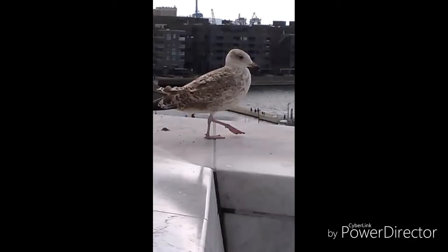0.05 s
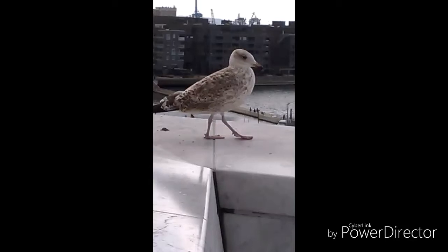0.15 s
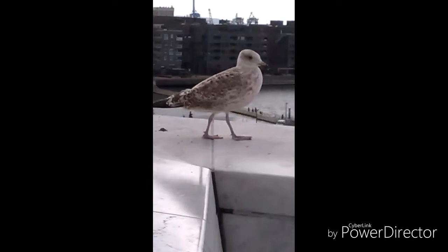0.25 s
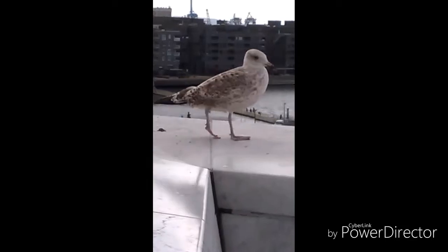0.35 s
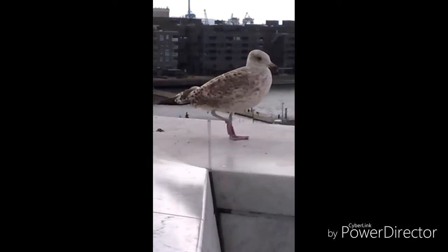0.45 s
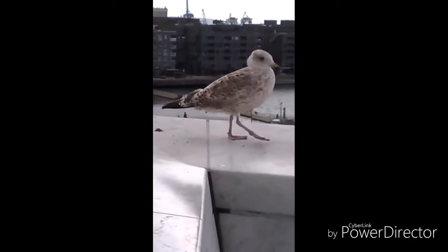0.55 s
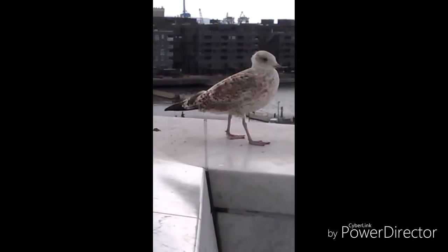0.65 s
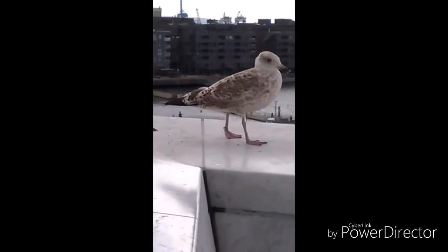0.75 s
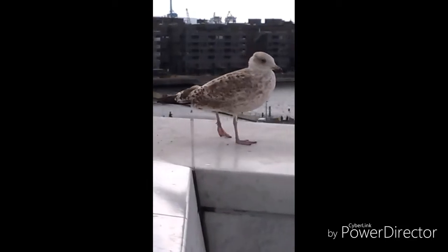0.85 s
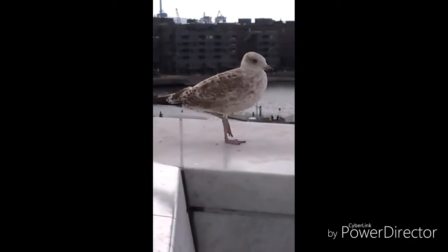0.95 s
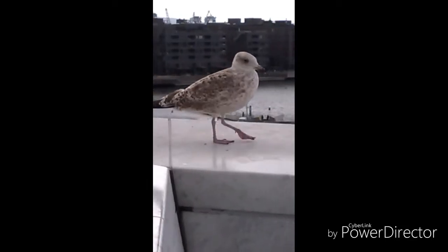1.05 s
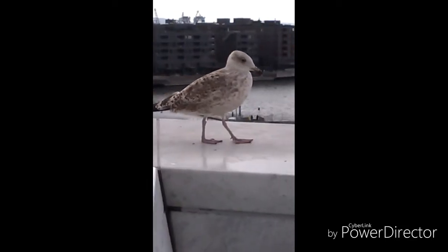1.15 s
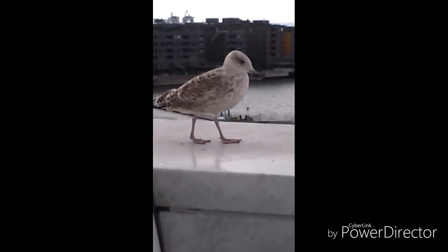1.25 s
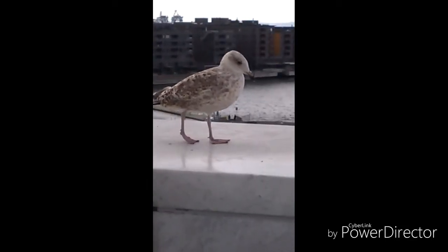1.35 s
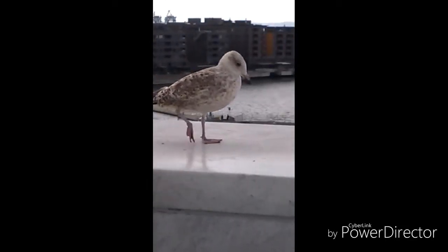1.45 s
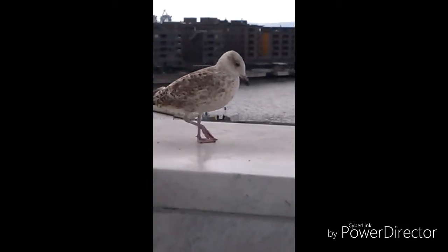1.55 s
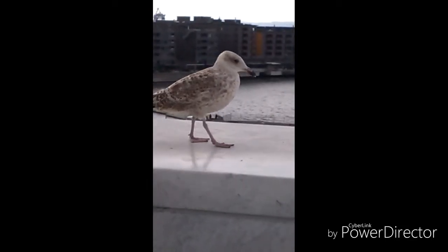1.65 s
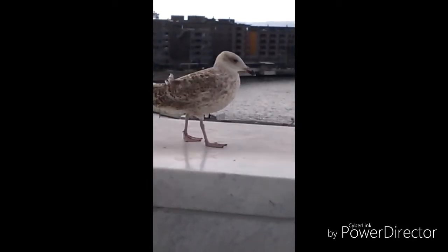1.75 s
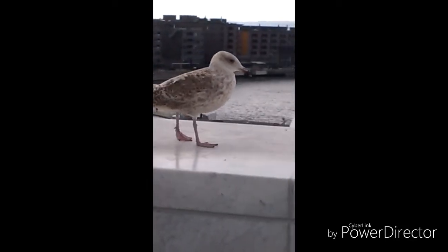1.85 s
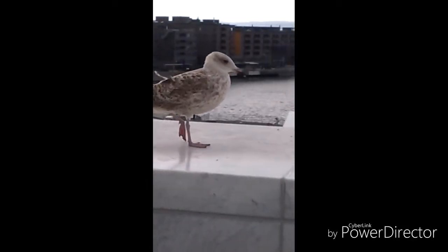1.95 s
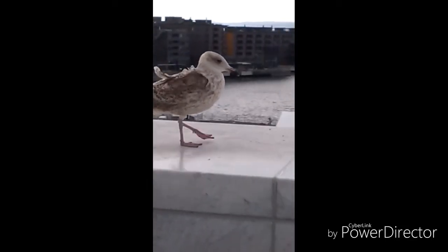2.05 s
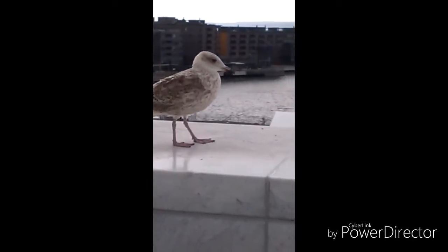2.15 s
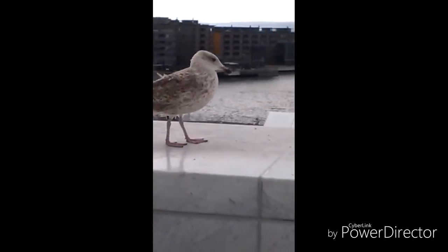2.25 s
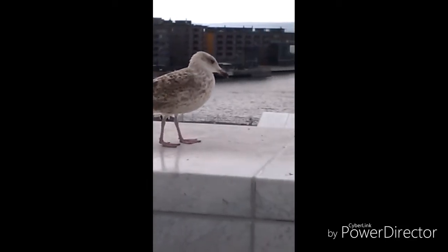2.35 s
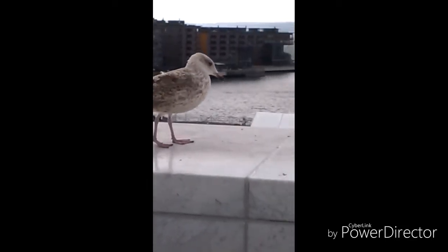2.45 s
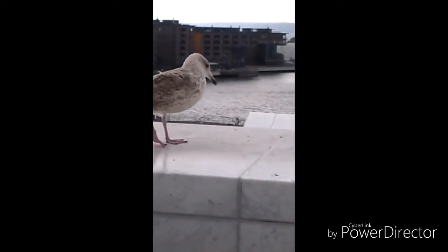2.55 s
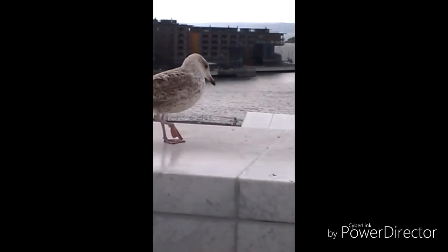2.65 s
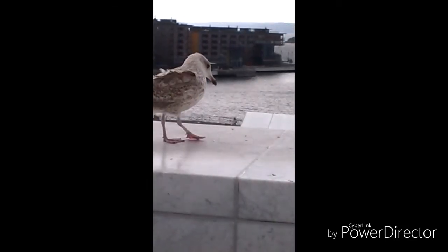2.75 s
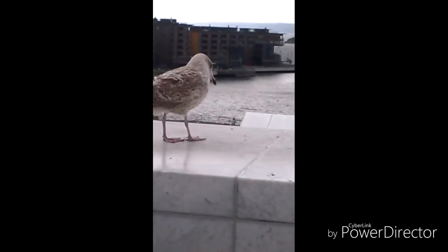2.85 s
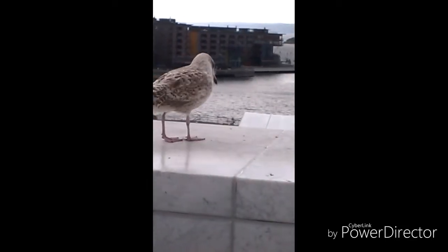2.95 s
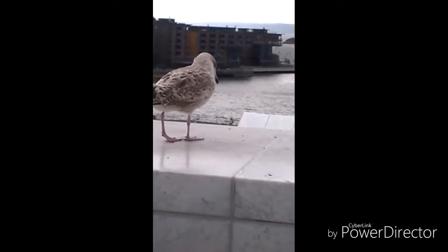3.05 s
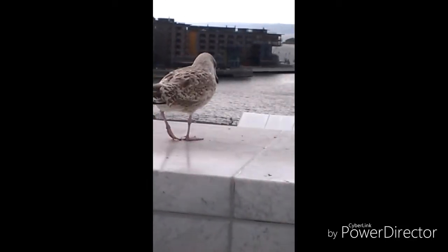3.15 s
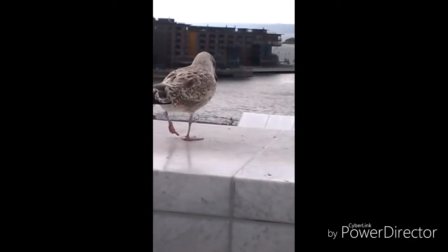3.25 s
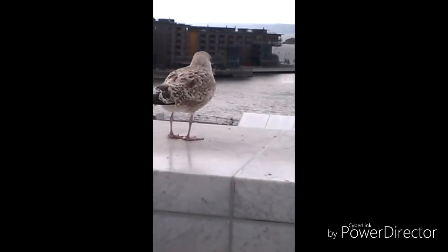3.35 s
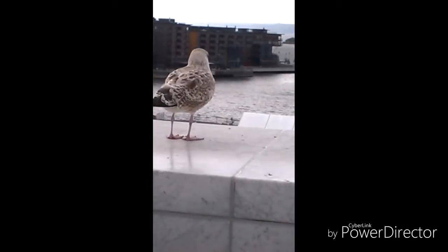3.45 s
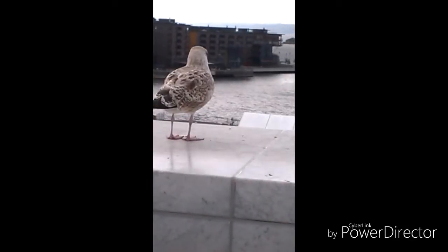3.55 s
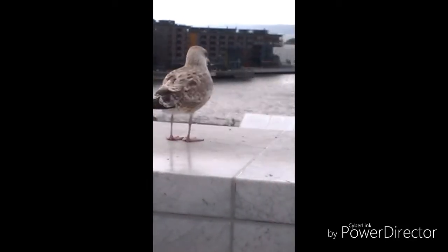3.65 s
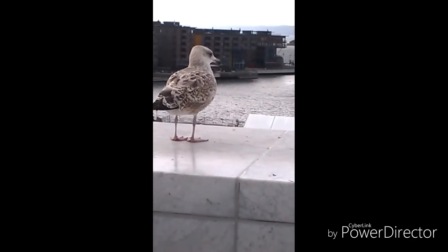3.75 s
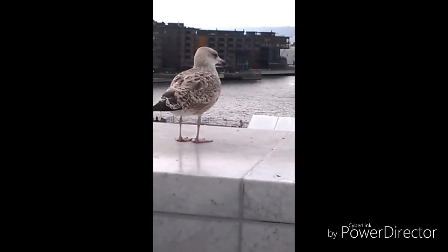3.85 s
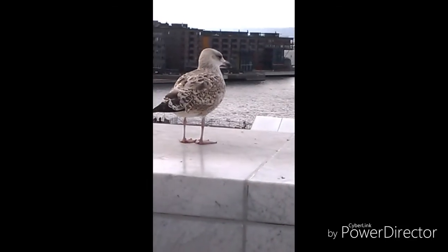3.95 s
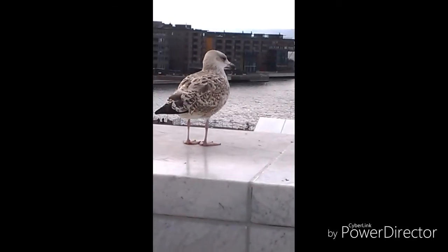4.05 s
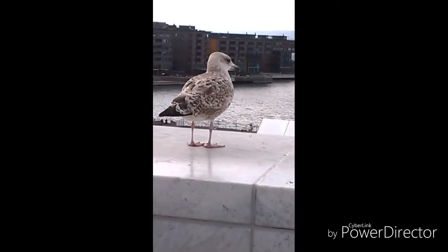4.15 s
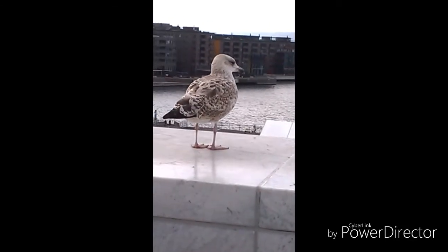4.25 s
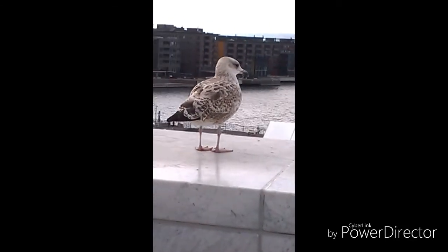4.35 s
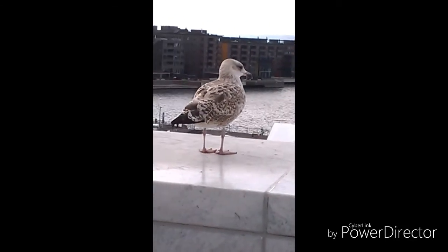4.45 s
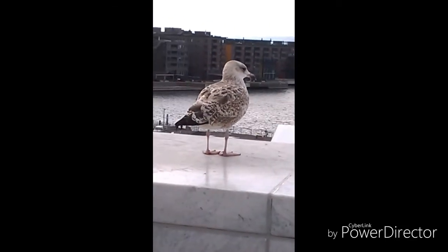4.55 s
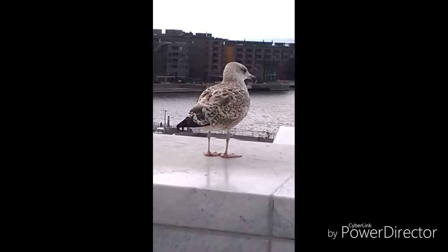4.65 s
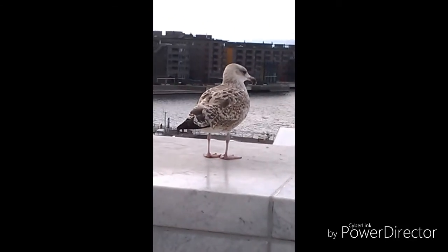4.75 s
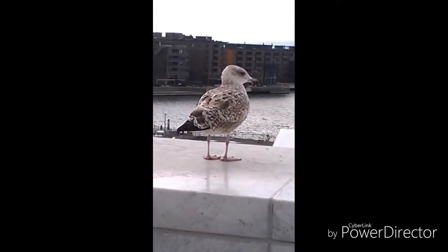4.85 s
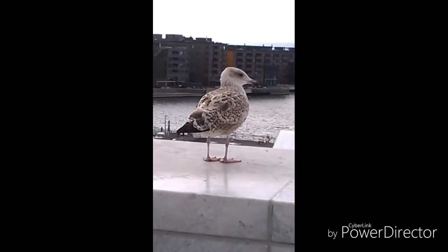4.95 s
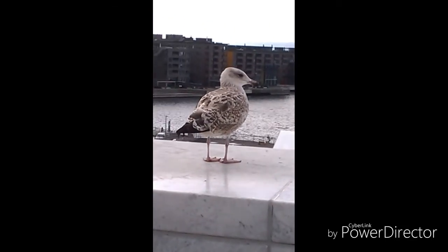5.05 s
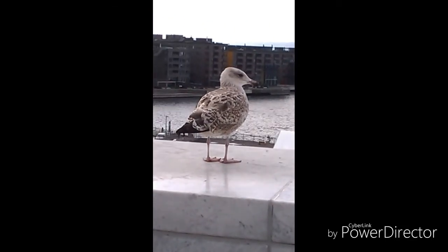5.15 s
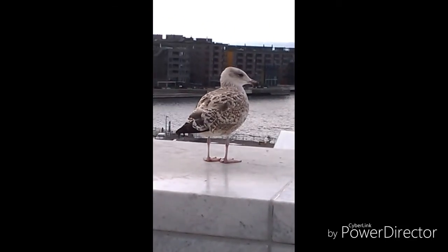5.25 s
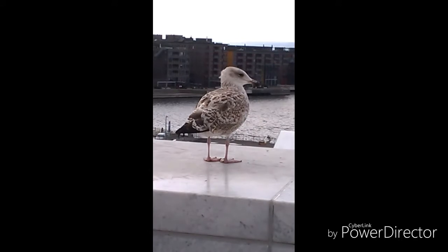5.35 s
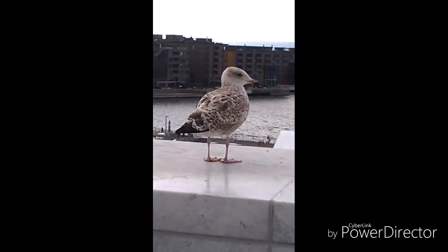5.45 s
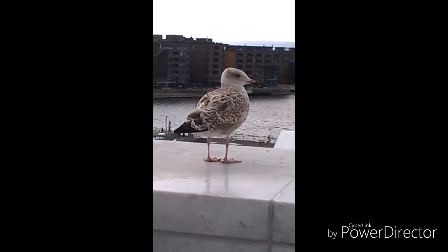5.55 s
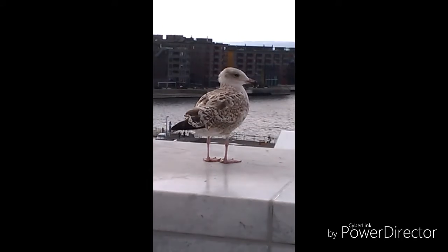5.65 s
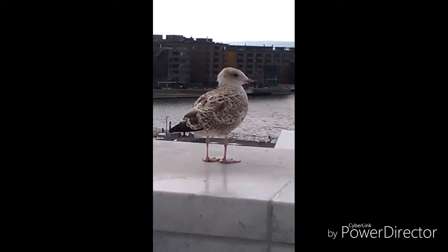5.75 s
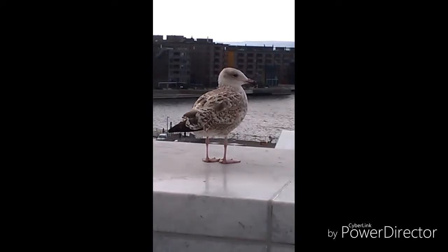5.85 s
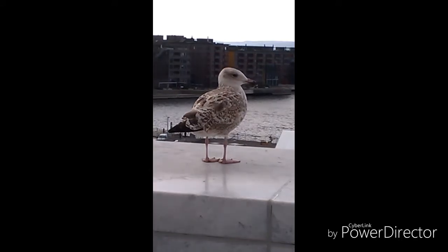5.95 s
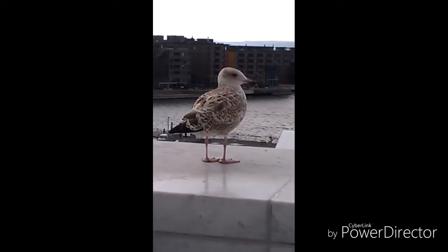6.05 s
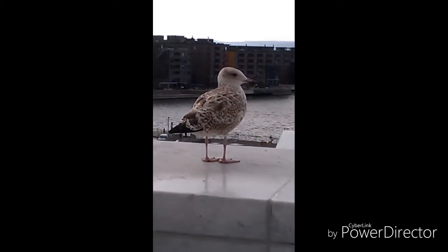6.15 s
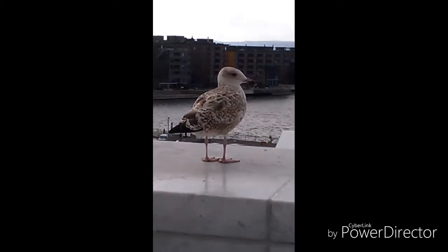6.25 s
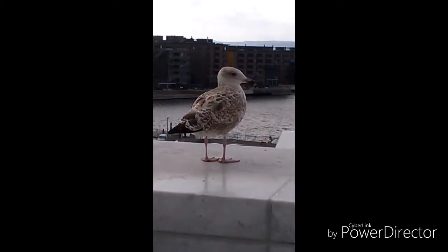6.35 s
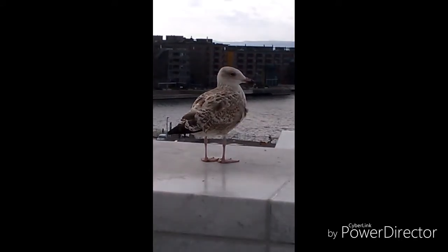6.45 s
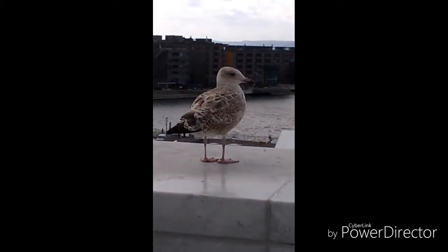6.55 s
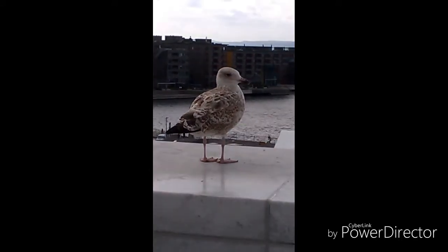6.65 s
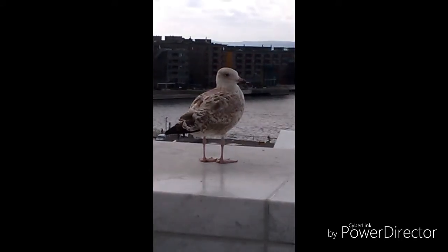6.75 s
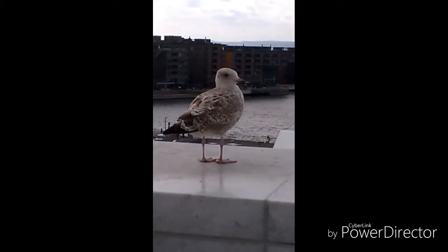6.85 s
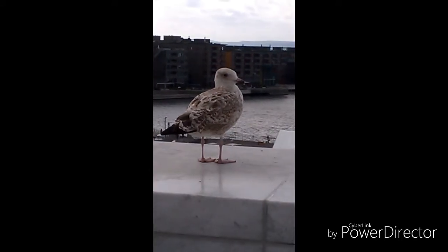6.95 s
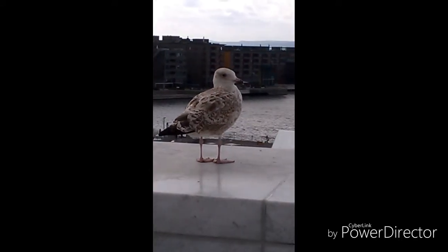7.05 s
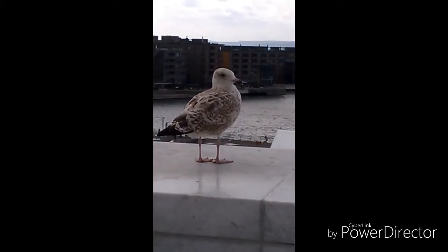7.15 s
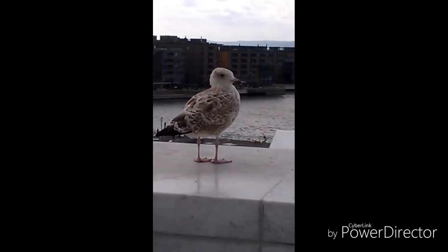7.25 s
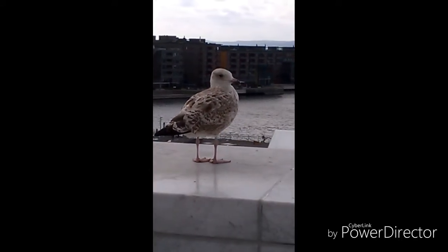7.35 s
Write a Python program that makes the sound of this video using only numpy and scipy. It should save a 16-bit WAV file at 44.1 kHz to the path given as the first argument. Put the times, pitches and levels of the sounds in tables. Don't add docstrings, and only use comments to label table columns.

```python
import sys
import numpy as np
from scipy import signal
from scipy.io import wavfile
from scipy.ndimage import uniform_filter1d, map_coordinates

SR = 44100
rng = np.random.default_rng(int(sys.argv[2]) if len(sys.argv) > 2 else 0)


def makeup_ratio(level_db):
    decades = np.asarray(level_db, float) / 20
    return 10 ** decades


def output_pcm(signal):
    pcm = np.clip(np.atleast_2d(signal).T, -1, 1) * 32767
    wavfile.write(sys.argv[1], SR, np.round(pcm).astype(np.int16))


N = 326781


def unit(x):
    return x / np.sqrt(np.mean(x ** 2) + 1e-20)


def along(points, hz):
    f, v = np.transpose(points)
    return np.interp(np.log(hz + 1), np.log(f + 1), v)


def wobble(rate, size):
    knots = rng.standard_normal(int(size * rate / SR) + 4)
    return map_coordinates(knots, [np.arange(size) * rate / SR])


def late(x, seconds):
    return np.pad(x, (round(seconds * SR), 0))[:N]


def span(start_s, end_s, rise, fall):
    u = np.linspace(1e-4, 1 - 1e-4, round((end_s - start_s) * SR))
    swell = np.minimum(1, np.minimum(u / rise, (1 - u) / fall))
    return u, 20 * np.log10(swell)


def add(out, start_s, hz, partials, jitter, flutter_db):
    wavering_hz = hz * (1 + jitter * wobble(123.7, len(hz)))
    phase = 2 * np.pi * np.cumsum(wavering_hz) / SR
    place = out[round(start_s * SR):][:len(hz)]
    for multiple, db in partials:
        level = np.sqrt(2) * makeup_ratio(db + flutter_db * wobble(74.3, len(hz)))
        place += level * np.sin(multiple * phase)


# (f/Hz, likeness 0-1)
ALIKE = [(130, 0.21), (400, 0.37), (800, 0.7), (1400, 0.88), (2200, 0.73), (3000, 0.84), (4300, 0.8),
         (6800, 0.86), (10000, 0.58), (15000, 0.47)]
# (f/Hz, left minus right level/dB)
LEAN = [(25, 10), (60, 4), (130, .6), (300, 1.3), (600, 0)]
TOP_HZ = 15500


def rush(spectrum, patchy_db):
    hz, _, z = signal.stft(rng.standard_normal((2, N)), SR, nperseg=1024)
    patches = uniform_filter1d(rng.standard_normal(z.shape[1:]), size=9, axis=0)
    patches = uniform_filter1d(patches, size=6, axis=1)
    turn = np.arccos(np.clip(along(ALIKE, hz), -1, 1))[:, None] / 2
    mid, side = z[0] * np.cos(turn), z[1] * np.sin(turn)
    colour_db = along(spectrum, hz) + along(LEAN, hz) * [[.5], [-.5]]
    colour = makeup_ratio(colour_db) * (hz < TOP_HZ)
    pair = np.array([mid + side, mid - side]) * colour[..., None] * makeup_ratio(patchy_db * unit(patches))
    return unit(signal.istft(pair, nperseg=1024)[1][:, :N])


# (t/s, level/dB)
WIND = [(.3, -50.5), (2, -49), (3.3, -49.5), (4.3, -47), (5.1, -49.5), (5.8, -46), (7.38, -48.5)]
# (t/s, town level/dB, water level/dB)
AIR = [(.3, -43.5, -47), (.8, -43.5, -47), (1.05, -49.5, -49), (1.35, -48, -49.5), (1.7, -49, -50.5),
       (2.05, -48.5, -52.5), (2.6, -47, -51.5), (3.2, -45, -50), (3.7, -46.5, -49), (4.0, -44.5, -47.5),
       (4.25, -46.5, -44), (4.55, -40.5, -43.5), (5.2, -43, -44), (5.5, -44.5, -47), (5.9, -48.5, -46.5),
       (6.6, -45, -48), (7.0, -48.5, -49.5), (7.379, -53, -51.5)]
# (f/Hz, level/dB per Hz)
BUFFET = [(15, -44), (25, -15), (40, -5.5), (55, -4.5), (85, -2), (115, -2), (170, -6.5), (350, -12),
          (700, -29.5), (3000, -100)]
TOWN = [(120, -8), (300, -1), (700, 1), (1100, -1.5), (1800, -10.5), (3000, -45), (9000, -90)]
WATER = [(500, -24), (1000, -2), (1500, 2), (2300, -0.5), (3500, -3), (6000, -40), (13000, -67)]
HISS = [(2000, -20), (4000, 0), (5000, -4), (6300, -10), (8000, -15), (10000, -20), (12000, -30),
        (14000, -50)]
CAPSULE = [(4000, -6), (7000, -7.5), (9000, -10), (12000, -10.5), (15000, -13.5)]


def air():
    t = np.arange(N) / SR
    s, *levels = np.transpose(AIR)
    town_db, water_db = [np.interp(t, s, c) for c in levels]
    buffet_db = np.interp(t, *np.transpose(WIND))
    hiss_db = -55 + 1.32 * (water_db + 48.5)
    gust = wobble(3.88, N)
    lumps = makeup_ratio(0.33 * np.array([wobble(7, N), wobble(8.5, N)]))
    buffet = makeup_ratio(buffet_db + 4.0) * unit(lumps * rush(BUFFET, patchy_db=0.5))
    town = makeup_ratio(town_db + 2 + 0.14 * gust + 0.16 * wobble(15, N)) * rush(TOWN, patchy_db=1.65)
    water = makeup_ratio(water_db + 5.0 + 0.19 * gust + 0.85 * wobble(8, N)) * rush(WATER, patchy_db=2.0)
    hiss = makeup_ratio(hiss_db + 5 + .4 * gust + .6 * wobble(10, N)) * rush(HISS, patchy_db=.6)
    creep_db = 0.5 * t
    capsule = makeup_ratio(-57.5 + creep_db + 0.56 * wobble(4.5, N)) * rush(CAPSULE, patchy_db=3.2)
    return buffet + town + water + hiss + capsule


def quay(x):
    t = np.arange(SR // 2) / SR
    tail = rng.standard_normal((2, len(t))) * makeup_ratio(-60 * t / 0.9) * (t > .012)
    return signal.fftconvolve(x[None], tail / np.linalg.norm(tail[0]), axes=1)[:, :N]


def flock(notes, arch_hz, bow, jitter, flutter_db):
    out = np.zeros(N)
    for start, length, hz0, hz1, db in notes:
        u, swell = span(start, start + length, rise=0.037, fall=0.049)
        arch = 4 * u * (1 - u) * (arch_hz + bow * abs(hz1 - hz0))
        glide = (1 - u) * hz0 + u * hz1 + arch
        add(out, start, glide, [(0.99, db + swell)], jitter=jitter, flutter_db=flutter_db)
    return out


COLONY_START_S, COLONY_CALLS, COLONY_DB = 2.7, 56, -55.5


def colony_cries():
    when, long, pitch, fall, loud = rng.random((COLONY_CALLS, 5)).T
    hz = 2900 + 2300 * pitch
    starts = COLONY_START_S + when * (N / SR - COLONY_START_S - .15)
    level_db = COLONY_DB + 6 * (loud - .5)
    return np.transpose([starts, .03 + .07 * long, hz, hz * (1 - .15 * fall), level_db])


def colony():
    return np.array([flock(colony_cries(), arch_hz=30, bow=.1, jitter=.015, flutter_db=4) for _ in "LR"])


# (start t/s, length t/s, start f/Hz, end f/Hz, level/dB)
WHISTLES = [(.27, .08, 3800, 4050, -57), (.79, .04, 4050, 4300, -56), (1.35, .09, 5100, 5050, -63),
            (1.43, .06, 5000, 4200, -58), (1.66, .185, 2900, 4066, -56), (2.1, .21, 2750, 4156, -57),
            (2.965, .09, 4964, 4997, -51), (3.05, .045, 5020, 4400, -54), (3.33, .19, 3000, 4230, -56),
            (4.215, .1, 4850, 5050, -49), (4.31, .065, 5050, 4300, -48), (4.55, .21, 2800, 4130, -53),
            (5.45, .11, 5000, 4600, -60), (5.81, .18, 3150, 4130, -52), (6.92, .14, 3745, 4144, -53),
            (7.06, .13, 4150, 3785, -56)]
# (start t/s, length t/s, start f/Hz, end f/Hz, level/dB)
WHINES = [(.49, .13, 4000, 3050, -58), (.835, .1, 3750, 2900, -56), (1.103, .022, 3600, 3600, -54),
          (1.195, .025, 3650, 3550, -54), (1.285, .03, 3570, 3550, -55), (2.4, .15, 4250, 3100, -54.5),
          (2.89, .07, 4200, 3200, -57), (3.72, .07, 3600, 3150, -55), (6.33, .09, 4750, 4250, -54),
          (6.4, .3, 4200, 3600, -57), (7.0, .07, 4900, 4300, -54), (7.1, .11, 4400, 3600, -51)]
RASP_HZ = 190


def young_birds():
    whistles = flock(WHISTLES, arch_hz=60, bow=.11, jitter=.005, flutter_db=2)
    rattle_hz = RASP_HZ * makeup_ratio(wobble(30, N))
    rasp = 1 + 1.6 * np.cos(2 * np.pi * np.cumsum(rattle_hz) / SR)
    whines = .6 * rasp * flock(WHINES, arch_hz=20, bow=.03, jitter=.012, flutter_db=3)
    return (whistles + whines) * [[-makeup_ratio(-16)], [makeup_ratio(7)]]


# (start t/s, length t/s, start f/Hz, end f/Hz, level/dB)
ANSWERS = [(2.66, .04, 4939, 4939, -54), (2.865, .055, 2910, 3041, -49), (3.2, .08, 5180, 5400, -56),
           (3.68, .035, 4902, 4922, -53), (3.715, .035, 5238, 5238, -50), (4.25, .085, 3150, 2880, -44),
           (4.585, .075, 3020, 2850, -44), (4.86, .07, 2950, 2890, -38.5), (5.17, .04, 3007, 2909, -43),
           (5.425, .04, 2967, 2967, -41), (5.67, .03, 3700, 3700, -48), (5.715, .04, 2985, 2935, -42),
           (6.0, .06, 2950, 2850, -46), (6.36, .04, 3447, 3297, -50), (6.655, .035, 2940, 2744, -47),
           (6.69, .045, 4599, 4480, -49), (6.69, .055, 3555, 3055, -50), (6.79, .03, 3441, 3441, -49),
           (6.94, .035, 3656, 3656, -47), (7.0, .07, 3560, 3020, -48)]


def answers():
    return flock(ANSWERS, arch_hz=35, bow=0, jitter=.006, flutter_db=2)


# (t/s, peak level/dB, ring f/Hz)
TAPS = [
    (1.76, -22, 1670),
    (1.7765, -19.5, 1590),
    (1.7864, -22, 1500),
    (1.8235, -22.5, 2080),
]
# (t/s, peak level/dB)
TICKS = [
    (1.0281, -45),
    (1.0744, -38),
    (1.3668, -37),
    (1.4845, -39),
    (1.5844, -42),
    (1.8003, -35),
    (1.8781, -42),
]


def feet():
    out, t = np.zeros(N), np.arange(SR // 20) / SR
    for s, db, hz in TAPS:
        onset = 1 - np.exp(-t / 0.00034)
        ring = makeup_ratio(db - 9.5 - 60 * t / 0.023) * np.sin(2 * np.pi * hz * t)
        out[round(s * SR):][:len(t)] += ring * onset
    for s, db in TICKS:
        grit = rng.standard_normal(len(t) + 3)
        bright = grit[3:] - grit[:-3]
        out[round(s * SR):][:len(t)] += makeup_ratio(db - 9.0 - 60 * t / 0.013) * bright
    return out


# (t/s, pitch f/Hz, level/dB, membrane drive lifting 2nd partial level/dB,
# beak gape lifting 3rd partial level/dB)
HELD = [
    (2.243, 1406, -46, 13, 3),
    (2.265, 1427, -43.5, -2.5, -5),
    (2.295, 1450, -44, -15, -4.5),
    (2.473, 1420, -43.5, -17, -18),
    (2.5, 1444, -42.5, 2, -18),
    (2.601, 1463, -38.5, -2, -11.5),
    (2.708, 1483, -36.5, -0.5, -21),
    (2.735, 1443, -40, 6, 1),
    (2.765, 1390, -43, -11, -5),
]


def held_note():
    out = np.zeros(N)
    s, *cols = np.transpose(HELD)
    u, swell = span(s[0], s[-1], rise=0.024, fall=0.014)
    hz, db, drive, gape = [np.interp(s[0] + u * (s[-1] - s[0]), s, c) for c in cols]
    level = db + swell
    add(out, s[0], hz, [(1, level), (2, level + drive), (3, level + gape)], jitter=0.0043, flutter_db=1.0)
    return out


# (start t/s, length t/s, pitch f/Hz, level/dB, overtones over it level/dB)
LEADS = [
    (2.945, .107, 1225, -44, -5),
    (3.31, .066, 1215, -43, -7),
    (3.655, .066, 1209, -45, -7),
    (4.025, .04, 1196, -41.5, -11),
    (5.675, .045, 1235, -45, -10),
    (5.96, .04, 1232, -48, -5),
    (6.94, .075, 1215, -48, 1),
]
LEAD_CLIMB_HZ = 37


def leads():
    out = np.zeros(N)
    for start, length, hz, first, over_db in LEADS:
        u, swell = span(start, start + length, rise=0.1, fall=0.05)
        overtones = first + over_db + 2.5 - 7 * u + swell
        levels = [first - 1 + 3 * u + swell, overtones, overtones - 7]
        add(out, start, hz + LEAD_CLIMB_HZ * u, list(enumerate(levels, 1)), jitter=.004, flutter_db=2)
    return out


# (start t/s, length t/s, level/dB, share of the note before the pitch gives way 0-1,
# fundamental held back level/dB)
YELPS = [(3.045, 0.07, -38, 0.16, -2), (3.369, 0.11, -35.5, .36, 2), (3.722, 0.12, -37.5, 0.41, 4),
         (4.067, 0.12, -38.5, 0.35, 7), (4.422, .12, -41, 0.32, 9), (4.768, 0.088, -36, 0.32, 17),
         (5.1, 0.1, -34.5, 0.53, 9), (5.396, 0.12, -36, .52, 13), (5.746, 0.089, -35.5, 0.57, 17),
         (6.069, 0.12, -39.5, 0.41, 12), (6.422, .1, -39.5, 0.63, 14), (6.766, 0.11, -36.5, 0.55, 22),
         (7.089, 0.096, -34, .6, 16)]
# (position 0-1, 1st, 2nd, 3rd partial over its level/dB)
YELP_SHAPE = [(0, -8, -6, -32), (.1, -3, -2.5, -24), (.4, -2, -1, -21), (.66, -1, 0, -9), (.88, -1, -3, -9),
              (1, -5, -11, -26)]
YELP_HZ, TIRE_HZ_PER_S, SCOOP_HZ, SAG_HZ = 1446.4, 8.13, 25, 152
CHEST_DB, CHEST_FADE_DB_PER_S = -35.5, 1.2
HOOK_DB = 14
THIN_DB, FOURTH_DB = 12, -15


def yelps():
    out = np.zeros(N)
    place, *shape = np.transpose(YELP_SHAPE)
    for start, length, db, held, back_db in YELPS:
        since_s = start - YELPS[0][0]
        u, swell = span(start, start + length, rise=0.036, fall=0.0047)
        give = np.sin(np.pi / 2 * np.clip((u - held) / (1 - held), 0, 1)) ** 2
        hz = YELP_HZ - TIRE_HZ_PER_S * since_s - SCOOP_HZ * np.exp(-u / 0.16) - SAG_HZ * give
        first, second, third = [swell + np.interp(u, place, c) for c in shape]
        first = first + CHEST_DB - CHEST_FADE_DB_PER_S * since_s
        first = first - back_db * (1 - give) ** 2
        second = second + db + HOOK_DB * (held - .3) * (2 * np.sqrt(give) - 1)
        third = third + db - THIN_DB * (held - .3)
        fourth = third + FOURTH_DB
        partials = [(1, first), (2, second), (3, third), (4, fourth), (5, fourth)]
        add(out, start, hz, partials, jitter=0.004, flutter_db=1.8)
    return out


# (start t/s, length t/s, level/dB, 4th over 3rd partial level/dB)
BREAKS = [(2.758, 0.0296, -38.5, -6), (3.107, 0.053, -41.5, -2), (3.474, 0.046, -42, -1),
          (3.835, 0.038, -44, 0.5), (4.185, 0.04, -42.5, 0), (4.535, 0.026, -46, -1),
          (4.85, 0.048, -40, -5), (5.203, 0.035, -40.5, -4), (5.516, 0.041, -40, -6.5),
          (5.84, 0.05, -41.5, -7), (6.194, 0.042, -41.5, -6), (6.512, 0.086, -44.5, -5),
          (6.864, 0.059, -42, -2), (7.185, .07, -43, 1)]
BREAK_HZ, BREAK_SAG_HZ = 1118, 93.3


def breaks():
    out = np.zeros(N)
    for start, length, third, tilt_db in BREAKS:
        u, swell = span(start, start + length, rise=0.12, fall=0.32)
        fourth = third + tilt_db
        levels = [third - 6, third - 12 + 1.3 * start, third + 2.5, fourth + 2, fourth - 19]
        sag = BREAK_HZ - BREAK_SAG_HZ * u ** 1.35
        partials = [(k, db + swell) for k, db in enumerate(levels, 1)]
        add(out, start, sag, partials, jitter=.006, flutter_db=2)
    return out


def gull():
    return held_note() + leads() + yelps() + breaks()


STONE_ECHO_S, ECHO_S, FAR_ECHO_S = 380 / 44100, 22084 / 44100, 1.02


def scene():
    background = air() + colony() + young_birds() + feet()
    adults = gull() + answers()
    adults = adults - makeup_ratio(-13) * late(adults, STONE_ECHO_S)
    echo = makeup_ratio(-6) * late(adults, ECHO_S) * [[1], [-1]]
    far_shore = makeup_ratio(-16) * late(adults, FAR_ECHO_S) * [[.6], [1]]
    scatter = makeup_ratio(-21) * quay(adults)
    return background + adults + echo + far_shore + scatter


def roll_off(x):
    return signal.sosfilt(signal.butter(12, 15700, fs=SR, output="sos"), x)


START_S = 0.2646


def record(dry):
    opened = np.clip((np.arange(N) / SR - START_S) / 0.012, 0, 1)
    return roll_off(dry * opened)


dry = scene()
out = record(dry)
output_pcm(out)
```